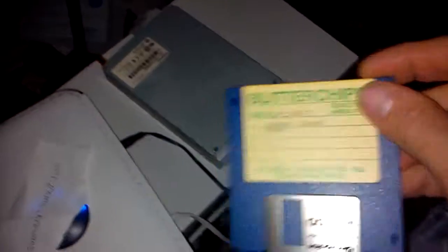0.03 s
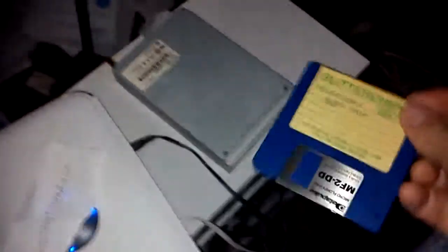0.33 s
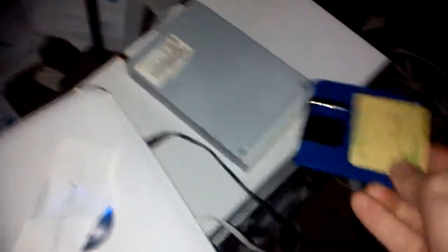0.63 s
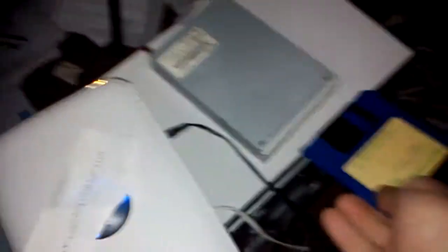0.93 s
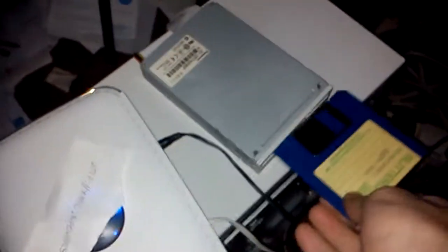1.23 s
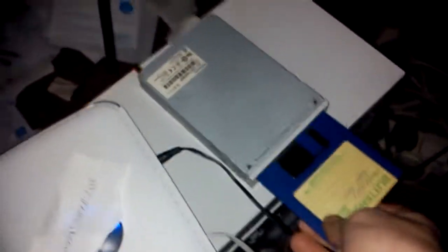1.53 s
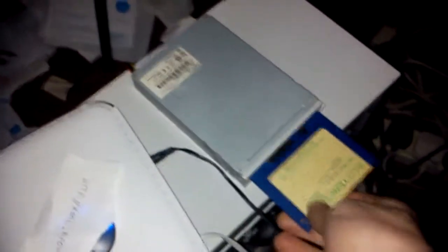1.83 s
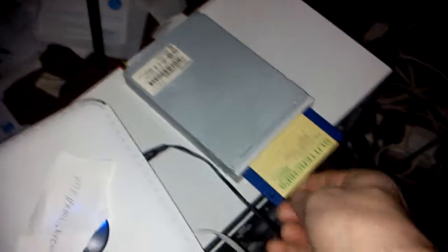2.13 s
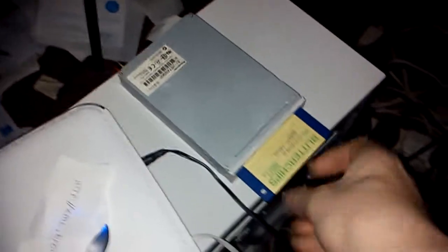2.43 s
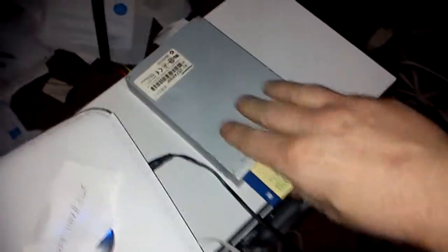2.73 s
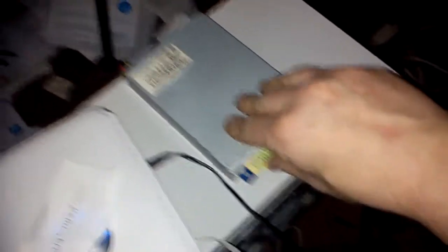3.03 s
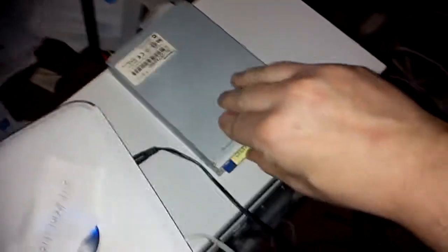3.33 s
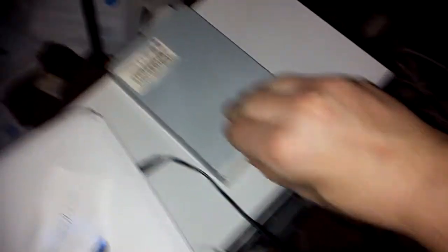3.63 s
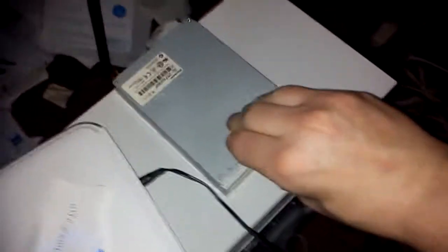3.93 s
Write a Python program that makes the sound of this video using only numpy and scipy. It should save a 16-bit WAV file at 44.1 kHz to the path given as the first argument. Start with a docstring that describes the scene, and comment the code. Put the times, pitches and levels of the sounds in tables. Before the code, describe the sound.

Close up in a small room, a floppy disk knocks lightly on a drive's slot, scrapes inward and clicks as it is pressed home. The latch finally snaps down with a sharp clack. A fan hums softly throughout.

```python
"""A fan hums in a small room throughout. A floppy disk is turned in the hand with a soft swish,
knocks against the slot of an external drive and slides in, plastic hissing on plastic.
Fingers push it home: the shutter scrapes open, the carriage clicks and the desk rumbles faintly.
At last the sprung latch drops with a loud clack. All is heard close, a little right of the drive."""
import sys
import numpy as np
from scipy import signal
from scipy.fft import rfft, irfft, next_fast_len
from scipy.io import wavfile

SR = 44100
rng = np.random.default_rng(int(sys.argv[2]) if len(sys.argv) > 2 else 0)


def unload_audio(sound):
    """Save the sound as a 16-bit wav file, at the path given as the first command line argument."""
    columns = np.transpose(np.atleast_2d(sound))
    # keep every value between -1 and 1, then stretch to whole-number steps
    steps = np.round(np.clip(columns, -1, 1) * 32767)
    wavfile.write(sys.argv[1], SR, steps.astype(np.int16))


N = 176400
TIME = np.arange(N) / SR
RING_TIME = TIME[:SR // 5]
TREBLE_HZ = 3100   # echoes and ripple colour the sound mainly above this

# how alike left and right are: (frequency [Hz], likeness [0-1])
LIKENESS = [(50, 0.46), (280, 0.82), (700, 0.68), (1400, 0.45), (3000, 0), (7000, 0)]


def from_db(db):
    """Decibels to gain."""
    return 10 ** (np.asarray(db) / 20)


def rms_one(x):
    """Scale to unit power."""
    return x / np.sqrt(np.mean(x ** 2) + 1e-20)


def bin_hz(size):
    """The frequencies in the spectrum of size samples."""
    return np.arange(size // 2 + 1) * SR / size


def at_hz(points, hz):
    """Read a curve along log frequency."""
    point_hz, value = np.transpose(points)
    return np.interp(np.log(hz + 1), np.log(point_hz), value)


def add(out, s, sound):
    """Mix a sound in at s seconds."""
    start = int(s * SR)
    out[:, start:start + sound.shape[-1]] += sound[:, :N - start]


def drift(rate_hz):
    """A smooth random wobble of unit power."""
    return rms_one(irfft(rfft(rng.standard_normal(N)) / (1 + (bin_hz(N) / rate_hz) ** 4), N))


def ripple(size, depth_db=1.5, step_hz=200.3):
    """Every contact point has its own random peaks and dips across the treble, in dB."""
    hz = bin_hz(size)
    heights = rng.standard_normal(size=256)
    return depth_db * np.interp(hz / step_hz, np.arange(len(heights)), heights) * hz / (hz + TREBLE_HZ)


def coloured(spectrum, size=N, grain=1, peaks_db=0):
    """Shaped stereo noise, narrow in the bass and wide on top; grain breaks it into specks."""
    hz = bin_hz(size)
    mid, side = rfft(rng.standard_normal((2, size)) * grain)
    alike = np.clip(at_hz(LIKENESS, hz), 0, 1)
    pair = np.sqrt(1 + alike) * mid + np.sqrt(1 - alike) * side * np.array([[1], [-1]])
    (low_hz, low_db), (high_hz, high_db) = spectrum[0], spectrum[-1]
    rolled_off = [(low_hz / 2, low_db - 20), *spectrum, (high_hz * 2, high_db - 20)]
    return rms_one(irfft(pair * from_db(at_hz(rolled_off, hz) + peaks_db), size))


def decay(t60, attack_s):
    """Quick attack, exponential release."""
    return (1 - np.exp(-RING_TIME / attack_s)) * np.exp(-np.log(1000) * RING_TIME / t60)


def struck(x):
    """Scale a blow to unit power over its first 10 ms."""
    return x / np.sqrt(np.mean(x[:, :SR // 100] ** 2))


def crash(spectrum, t60):
    """A noise burst: crowded modes dying together."""
    size = len(RING_TIME)
    return struck(coloured(spectrum, size, peaks_db=ripple(size)) * decay(t60, attack_s=0.00031))


def ring(modes):
    """Separate decaying modes; high ones reach left and right out of step."""
    out = 0
    for hz, db, t60 in modes:
        width = (1 - at_hz(LIKENESS, hz)) ** 2
        phase = rng.uniform(0, 2 * np.pi) + width * rng.uniform(-np.pi, np.pi, (2, 1))
        tone = np.sin(2 * np.pi * hz * RING_TIME + phase)
        out = out + from_db(db) * tone * decay(t60, attack_s=0.00079)
    return struck(out)


def fan(waver_hz=11.7, air_db=-58):
    """The fan's bed: wavering tones over a steady rush of air."""
    # fan tones: (frequency [Hz], level [dB], waver [0-1])
    hum = [(172.6, -70.5, 0.08), (177.5, -65, .3), (252.2, -72, .5), (289.6, -62, 0.05), (814, -74, 0.3),
           (858.3, -71, 0.7)]
    # rush of air: (frequency [Hz], noise density [dB])
    air = [(20, -11.5), (43, 0), (70, -8), (95, -9.5), (130, -9), (175, -10), (225, -10.5), (290, -9.5),
           (360, -11.5), (560, -8.5), (740, -16), (870, -13), (1600, -19.5), (3200, -25), (8000, -36),
           (16000, -33)]
    tones = 0
    for hz, db, waver in hum:
        swing = 1 + waver * (drift(waver_hz) + 1j * drift(waver_hz))   # in both level and phase
        carrier = np.exp(2j * np.pi * (hz * TIME + rng.random()))
        tones = tones + from_db(db) * rms_one(np.real(swing * carrier))
    return tones + from_db(air_db) * coloured(air)


def swells(rows):
    """Bell-shaped rises and falls of level."""
    return sum(from_db(db) * np.exp(-((TIME - s) / half) ** 2) for s, half, db in rows)


def handling():
    """The hand swishes as it shifts its grip, and the desk rumbles under its pressure."""
    # shifts of grip: (centre [s], half length [s], level [dB])
    swishes = [(.82, 0.35, -64), (2.54, 0.088, -61), (3.1, 0.052, -68), (3.33, .08, -68)]
    # soft, airy swish: (frequency [Hz], noise density [dB])
    swish_colour = [(1000, -6), (2200, -11), (4200, 1), (6500, -7), (8000, -6), (9600, 0), (11300, -9),
                    (13500, -1), (16000, -8.5)]
    # presses on the desk: (centre [s], half length [s], level [dB])
    presses = [(2.34, .06, -60), (2.86, 0.089, -55.5)]
    # desk rumble: (frequency [Hz], noise density [dB])
    desk_colour = [(20, 5), (45, 2), (100, -3.5), (200, -7), (500, -33)]
    return swells(swishes) * coloured(swish_colour) + swells(presses) * coloured(desk_colour)


def knocks(favour_octaves=0.6, far_modes_db=-9):
    """Each contact rings the touched part and the case, with a plastic clack and a bright tick on top."""
    # plastic knocks on the drive, each with a mix of three layers:
    # (time [s], level [dB], pitch [Hz], body trim [dB], clack trim [dB], tick trim [dB])
    contacts = [(1.168, -34, 1340, -6, -13.5, -23), (1.192, -38.5, 1340, -6, -16, -29),
                (1.208, -40.5, 1142, -6.5, -11.5, -22), (1.24, -31.5, 1614, -11, -13.5, -23.5),
                (1.326, -39.5, 1370, -12, -14, -19), (1.332, -34.5, 1610, -10.5, -13.5, -13.5),
                (1.351, -26.5, 1598, -8.5, -13.5, -16), (1.446, -28, 1557, -13.5, -16, -24.5),
                (1.467, -23.5, 997, -10.5, -18.5, -20), (1.608, -45.5, 1150, -10, -15, -28),
                (1.722, -37.5, 1070, -5, -19, -27), (2.175, -32, 1845, -10.5, -10, -21),
                (2.181, -30.5, 930, -9, -20.5, -26), (2.694, -42, 850, -12, -22, -19),
                (2.814, -48.5, 893, -0.5, -17, -27), (2.859, -29.5, 955, -13.5, -10.5, -21),
                (2.866, -33, 926, -8, -11, -25), (2.879, -33, 932, -13, -8.5, -27),
                (2.899, -33.5, 1300, -7.5, -22, -33), (3.001, -32.5, 1270, -11.5, -13, -23),
                (3.01, -38, 902, -2.5, -9, -25), (3.025, -41.5, 927, -6, -14, -22),
                (3.433, -31, 723, -5.5, -18, -28), (3.438, -33, 690, -13.5, -20, -23.5),
                (3.78, -29, 1242, -7.5, -10, -26)]
    # modes of the drive's case: (frequency [Hz], relative level [dB], t60 [s])
    case_modes = [(486, -6, 0.18), (634, -1.5, 0.1), (766, -7.5, 0.052), (916.6, 2.5, 0.068),
                  (1007, -5.5, 0.027), (1133, 2, 0.058), (1231, 1.5, 0.045), (1341, -0.5, 0.051),
                  (1436, -0.5, 0.065), (1575, 1.5, 0.041), (1912, 2, 0.051), (2550, -4.5, 0.065),
                  (3930, -4, 0.034)]
    # crowded upper modes of shell and shutter: (frequency [Hz], noise density [dB])
    clack_colour = [(300, -26), (550, -11), (900, -5), (1900, -0.5), (2600, 0), (3200, -9), (4100, -2.5),
                    (5500, -9), (7000, -13), (9000, -30)]
    # bright edge of a knock: (frequency [Hz], noise density [dB])
    tick_colour = [(4500, -40), (7000, -10), (8300, -3), (9800, 1), (11200, -6), (13500, -5),
                   (16000, -18.5)]
    out = np.zeros((2, N))
    mode_hz, mode_db, t60 = np.transpose(case_modes)
    for s, db, hz, body_db, clack_db, tick_db in contacts:
        # a contact excites the modes near its own pitch most
        far = 1 - np.exp(-(np.log2(mode_hz / hz) / favour_octaves) ** 2)
        case = from_db(-5) * ring(zip(mode_hz, mode_db + far_modes_db * far, t60))
        touched_part = from_db(-7) * ring([(hz, 0, 0.048)])
        body = from_db(body_db) * (case + touched_part)
        clack = from_db(clack_db - 3) * crash(clack_colour, t60=0.062)
        tick = from_db(tick_db - 4) * crash(tick_colour, t60=0.05)
        add(out, s, from_db(db) * (body + clack + tick))
    return out


def sliding(slips_per_s=3000, slip_spread_db=2.5, squeak_db=6, squeak_octaves=0.19, judder_db=0.5):
    """Dense tiny slips of plastic hiss, squeak faintly and make the case drone; the motion judders."""
    # the disk scrapes along the slot and its guides:
    # (centre [s], half length [s], hiss level [dB], drone level [dB], squeak pitch [Hz])
    scrapes = [(1.204, 0.039, -71, -50.5, 4200), (1.437, 0.016, -63, -63, 9600),
               (1.465, 0.0028, -49, -49, 9600), (1.718, 0.023, -65.5, -53, 13000),
               (1.853, 0.064, -58.5, -62, 9700), (1.919, 0.013, -50.5, -56, 13100),
               (1.941, 0.013, -52, -54, 9350), (2.02, 0.039, -50.5, -60.5, 9800),
               (2.091, 0.071, -57.5, -59, 6700), (2.175, 0.0085, -56, -48, 2500),
               (2.234, .035, -60.5, -58, 4200), (2.324, 0.29, -65.5, -65, 2200),
               (2.796, .035, -64, -56.5, 9800), (2.856, 0.0083, -49, -50, 6550),
               (2.879, 0.016, -49, -53, 10500), (2.992, .018, -58, -55.5, 9300),
               (3.42, 0.045, -62, -60, 6500), (3.723, 0.041, -66, -60, 4200),
               (3.769, 0.011, -60, -55.5, 4200)]
    # friction hiss: (frequency [Hz], noise density [dB])
    hiss_colour = [(1200, -2), (2300, -3.5), (3200, -5.5), (4500, -1.5), (7800, -6.5), (9600, -4),
                   (11200, -7), (15500, -8.5)]
    # drone of the case: (frequency [Hz], noise density [dB])
    drone_colour = [(300, -27), (600, -9), (920, -5), (1300, -4.5), (2000, -11), (3500, -20.5)]
    out, size = np.zeros((2, N)), SR // 2
    t, hz = TIME[:size] - size / 2 / SR, bin_hz(size)
    for s, half, hiss_db, drone_db, squeak_hz in scrapes:
        slipping = rng.random(size) < slips_per_s / SR
        slips = slipping * from_db(slip_spread_db * np.minimum(rng.exponential(1, size), 4))
        squeak = squeak_db * np.exp(-(np.log2((hz + 1) / squeak_hz) / squeak_octaves) ** 2)
        hiss = from_db(hiss_db) * coloured(hiss_colour, size, slips, peaks_db=squeak + ripple(size))
        drone = from_db(drone_db) * coloured(drone_colour, size, slips)
        add(out, s + t[0], (hiss + drone) * np.exp(-(t / half) ** 2))
    return out * from_db(judder_db * drift(rate_hz=160))


def latch():
    """The sprung carriage snaps down in a quick run of metal hits; the hardest sets it ringing."""
    # the latch drops and the carriage rattles down: (time [s], level [dB])
    hits = [(3.9810, -23.5), (3.9828, -17.5), (3.9867, -21.5), (3.9925, -17.5)]
    # broad crack of each hit: (frequency [Hz], noise density [dB])
    hit_colour = [(60, 3), (120, -2), (250, 0), (380, -7.5), (520, 1.5), (1400, 4.5), (2400, 2.5),
                  (3100, -3), (4100, -0.5), (5300, -3.5), (8200, -7), (10400, -1.5), (12000, -3.5),
                  (16000, -1)]
    # modes of the carriage: (frequency [Hz], relative level [dB], t60 [s])
    carriage_modes = [(280, -24, 0.091), (462, -18.5, 0.15), (575, -20, 0.06), (757, -11, 0.069),
                      (943, -6, 0.048), (1120, -9, 0.051), (1408, 7, 0.03), (2030, 0, 0.078),
                      (2140, -7, 0.066), (2530, -6, .07), (3990, -14, 0.052), (5010, -9, 0.093),
                      (5430, -8, 0.1), (6930, -6, 0.076), (9750, -7, .06)]
    out = np.zeros((2, N))
    for s, db in hits:
        add(out, s, from_db(db + 1.5) * crash(hit_colour, t60=0.076))
    hardest_s, _ = max(hits, key=lambda hit: hit[1])
    carriage = from_db(-13.5) * ring(carriage_modes)
    thump = from_db(-37.5) * ring([(106, 0, 0.15)])   # the latch jolts the desk
    add(out, hardest_s, carriage + thump)
    return out


def nearby(x, left_lead_s=0.00009):
    """The drive's sound arrives on the left first, and hard surfaces close by comb its treble."""
    # early echoes off desk and laptop: (left delay [s], right delay [s], level [dB])
    reflections = [(.0009, .0013, -11), (.0023, .0018, -11.5), (.0041, .0049, -13)]
    size = next_fast_len(N + SR // 10)
    hz = bin_hz(size)
    treble = (1j * hz / (TREBLE_HZ + 1j * hz)) ** 2
    echoes = sum(from_db(db) * np.exp(-2j * np.pi * hz * np.array([[left], [right]]))
                 for left, right, db in reflections)
    lead = np.exp(1j * np.pi * hz * left_lead_s * np.array([[1], [-1]]))
    return irfft(rfft(x, size) * (1 + treble * echoes) * lead, size)[:, :N]


def room(x, t60=0.21, onset_s=0.0043):
    """A short diffuse tail from desk and walls."""
    # tone of the reverb: (frequency [Hz], noise density [dB])
    tail_colour = [(150, -8), (500, 1), (1300, 1.5), (2500, 1.5), (5000, 1.5), (10000, -2.5), (16000, -5)]
    t = TIME[:SR // 2]
    envelope = (1 - np.exp(-t / onset_s)) * np.exp(-np.log(1000) * t / t60)
    tail = coloured(tail_colour, len(t)) * envelope
    return signal.fftconvolve(x, tail / np.sqrt(np.sum(tail ** 2) / 2), axes=1)[:, :N]


def scene():
    """Disk and drive up front with a touch of room, over the hand and the fan."""
    drive = nearby(knocks() + sliding() + latch())
    return drive + from_db(-11.5) * room(drive) + handling() + fan()


def record(dry, cutoff_hz=15750):
    """Left and right each get their own colour; any peak past full scale clips, and the top is cut."""
    # stereo balance: (frequency [Hz], left minus right [dB])
    balance = [(60, -0.5), (350, 2.5), (700, 3.5), (1400, 5.5), (2100, 4), (2700, -2.5), (3800, 4),
               (5200, 5.5), (7000, 5), (8300, 3), (9800, 10.5), (11300, -4), (14000, -2.5), (16000, -8)]
    size = next_fast_len(N + SR // 10)
    pan = from_db(np.array([[.5], [-.5]]) * at_hz(balance, bin_hz(size)))
    pan /= np.sqrt(np.mean(pan ** 2, axis=0))   # constant power
    heard = irfft(rfft(dry, size) * pan, size)[:, :N]
    lowpass = signal.ellip(12, .2, 70, cutoff_hz, fs=SR, output="sos")
    return signal.sosfilt(lowpass, np.clip(heard, -1, 1))


dry = scene()
out = record(dry)
unload_audio(out)
```